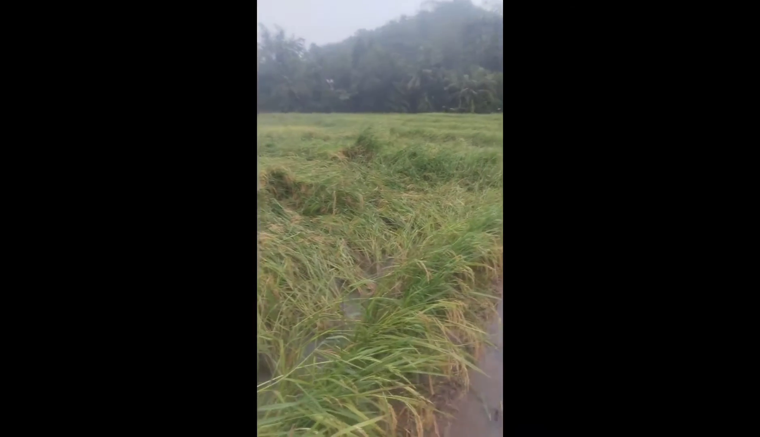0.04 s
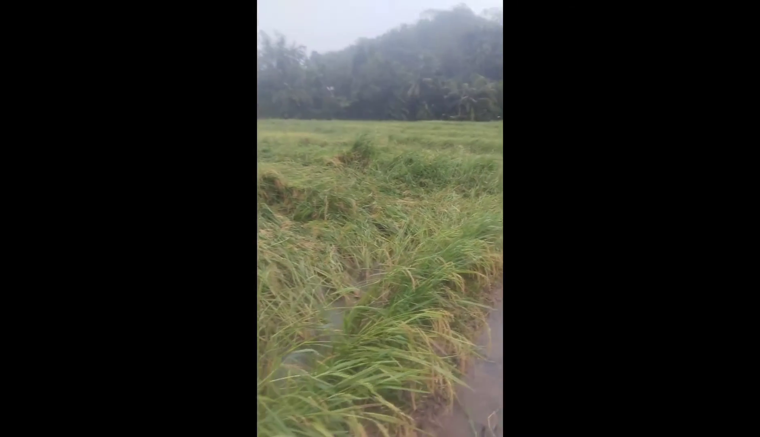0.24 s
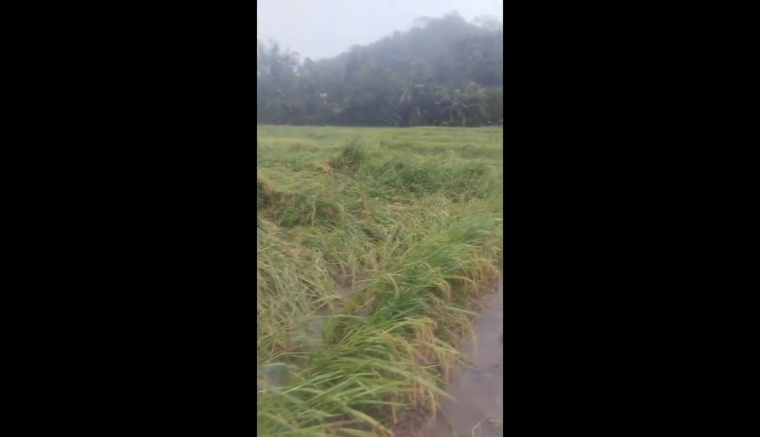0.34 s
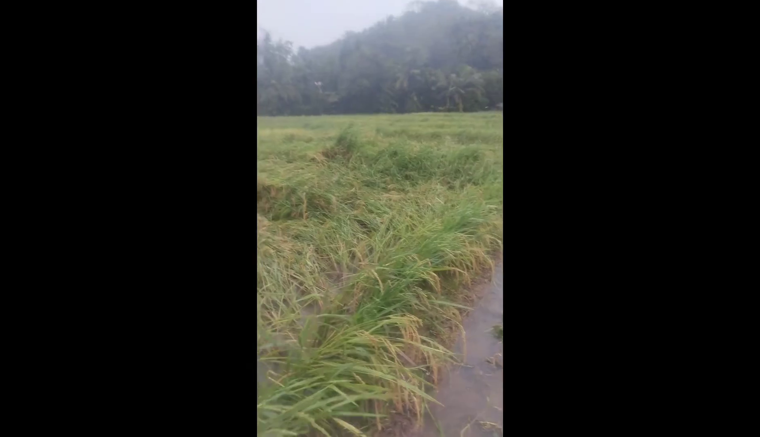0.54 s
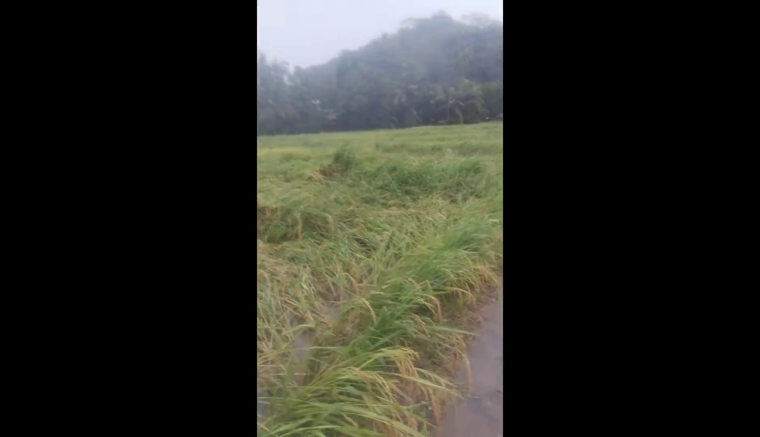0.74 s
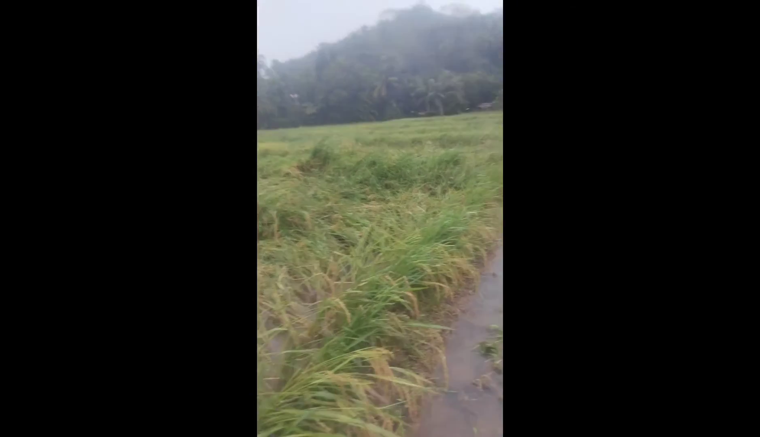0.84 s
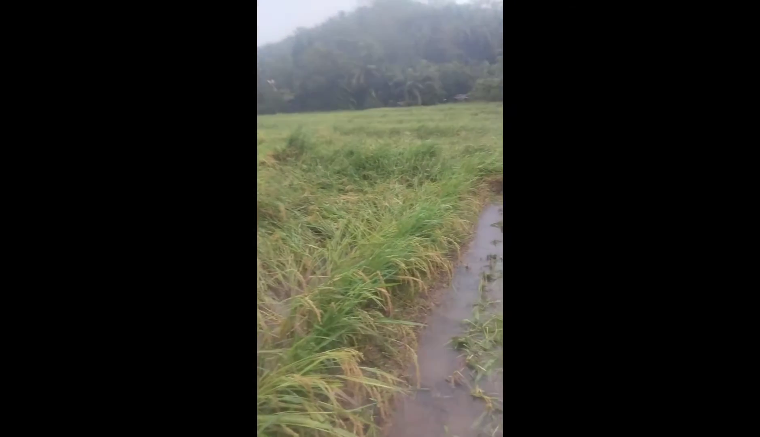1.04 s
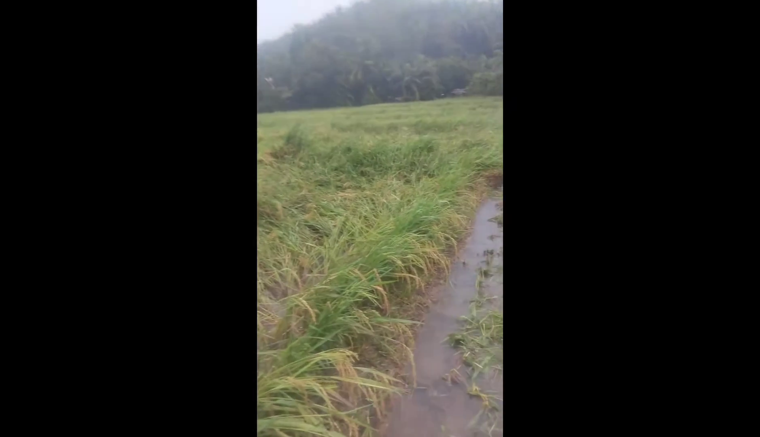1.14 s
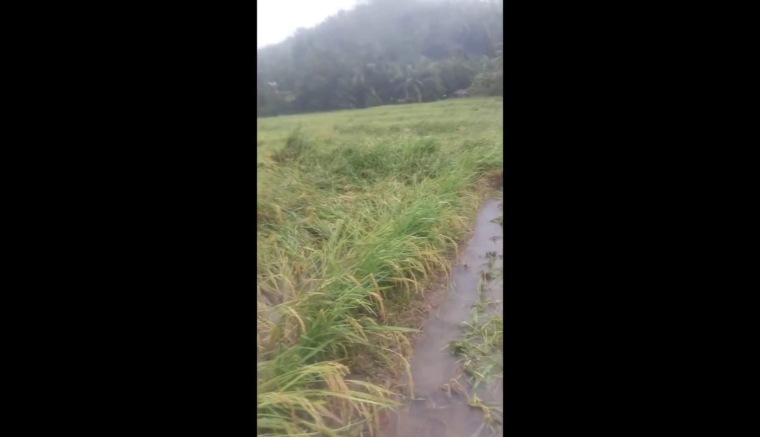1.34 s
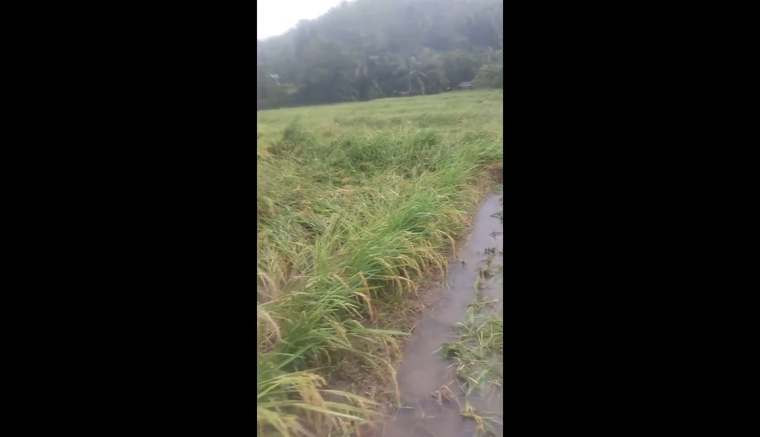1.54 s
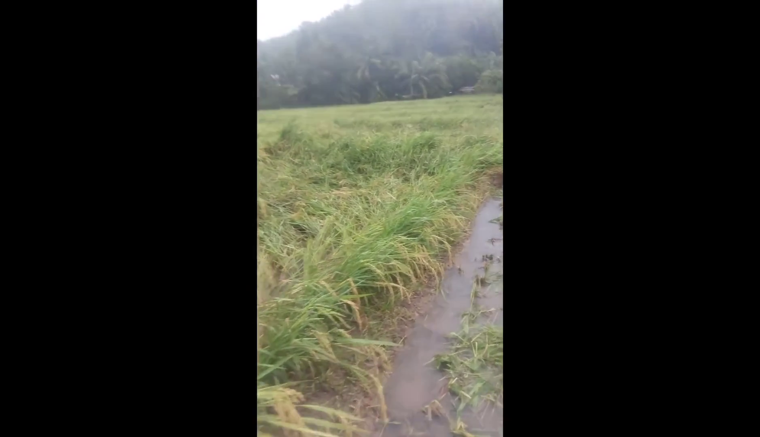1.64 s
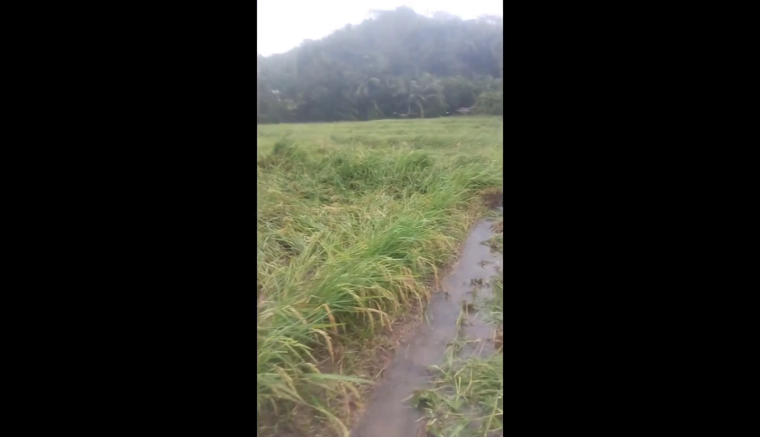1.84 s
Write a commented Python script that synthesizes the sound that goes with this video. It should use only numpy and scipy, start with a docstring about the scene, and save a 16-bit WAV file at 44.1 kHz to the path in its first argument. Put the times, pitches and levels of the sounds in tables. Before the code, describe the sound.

Close to the microphone, a foot squelches into wet mud with a sharp smack and small splash, then a second step lands with a hollow gulp and bubbles. Insects, a bird and distant calls sound faintly across the open field.

```python
"""Two slow, close steps squelch through the mud and shallow water of a flooded rice field.
Each foot lands with a thud or a gulp of trapped air, mud pockets smack open, and water splashes
and drips back. Behind them: insect hiss and trills, a low rumble, faint far calls and a thin
bird whistle. A gain control ducks briefly after loud peaks."""
import sys
import numpy as np
from scipy import signal
from scipy.fft import rfft, irfft, next_fast_len
from scipy.io import wavfile
from scipy.ndimage import map_coordinates

SR = 44100
rng = np.random.default_rng(int(sys.argv[2]) if len(sys.argv) > 2 else 0)


def inscribe(sig):
    """Save sig as 16-bit PCM at rate SR to the path in sys.argv[1].

    A 1-D sig is mono; a 2-D sig holds one channel per row.
    Samples are clipped to [-1, 1] before scaling.
    """
    pcm = np.round(np.clip(np.atleast_2d(sig).T, -1, 1) * 32767)
    wavfile.write(sys.argv[1], SR, pcm.astype(np.int16))


N = 83790
T = np.arange(N) / SR
BUBBLE_GLIDE = 0.088  # fractional pitch rise per t60
WATER_T60_S = 0.36


def amp(db):
    """Decibels to gain."""
    return 10 ** (np.asarray(db) / 20)


def unit(x):
    """Scale to rms 1."""
    return x / np.sqrt(np.mean(x ** 2) + 1e-20)


def add(out, start_s, x):
    """Mix x into out from start_s."""
    i = max(0, round(start_s * SR))
    out[i:i + len(x)] += x[:max(0, len(out) - i)]


def response(points, size):
    """FFT bin gains from (f/Hz, level/dB) points, log frequency axis."""
    hz, db = np.transpose(points)
    return amp(np.interp(np.log(np.fft.rfftfreq(size, 1 / SR) + 1), np.log(hz), db))


def colour(x, points):
    """Zero-phase filter through the points."""
    size = next_fast_len(len(x) + 8192)
    return irfft(rfft(x, size) * response(points, size), size)[:len(x)]


def impulse(points, size):
    """Minimum-phase impulse response: sharp front, peak 1."""
    cepstrum = irfft(np.log(response(points, size)), size)
    cepstrum[1:size // 2] *= 2
    cepstrum[size // 2 + 1:] = 0
    pulse = irfft(np.exp(rfft(cepstrum)), size)
    return pulse / np.abs(pulse).max()


def noise(points):
    """Coloured noise, rms 1."""
    return unit(colour(rng.standard_normal(N), points))


def wobble(knots_per_s):
    """Smooth random curve."""
    knots = rng.standard_normal(int(N * knots_per_s / SR) + 4)
    return map_coordinates(knots, [T * knots_per_s])


def tone(hz):
    """Sine following a pitch curve."""
    return np.sin(2 * np.pi * np.cumsum(hz) / SR)


def washed(x, wash_db, t60_s):
    """x plus a diffuse tail of its own colour."""
    t = T[:SR // 2]
    tail = rng.standard_normal(len(t)) * amp(-60 * t / t60_s) * (1 - np.exp(-t / 0.0022))
    wash = signal.fftconvolve(x, tail / np.linalg.norm(tail))
    return np.pad(x, (0, len(t) - 1)) + amp(wash_db) * wash


def ring(hz, rise_s, t60_s, glide):
    """Damped sine with soft onset and pitch glide."""
    t = T[:SR // 5]
    onset = np.sin(np.pi / 2 * np.minimum(t / rise_s, 1)) ** 2
    decay = amp(-60 * np.maximum(t - rise_s, 0) / t60_s)
    return onset * decay * tone(hz * (1 + glide * np.minimum(t / t60_s, 1)))


def specks(per_s, spread_db):
    """Tiny random impacts of uneven size."""
    size = amp(spread_db * np.minimum(rng.exponential(size=N), 4))
    return (rng.random(N) < per_s / SR) * size * rng.choice([-1, 1], N)


# hiss spectrum: f/Hz, level/dB
INSECT_SPECTRUM = [(4700, -25), (5150, -17), (5500, -13.5), (5900, -8), (6400, -10), (7200, -3.5),
                   (7800, 6), (8400, 3.5), (9200, -9.5), (10700, -21), (12000, -17.5), (13200, -4.5),
                   (15500, -16)]
# hiss envelope: t/s, level/dB
INSECT_ENVELOPE = [(0, -65.5), (0.3, -60), (0.45, -63), (1.25, -59.5), (1.66, -59), (1.9, -58.5)]


def insect_hiss():
    """Insects merge into a steady high hiss."""
    level_db = np.interp(T, *np.transpose(INSECT_ENVELOPE)) + 0.2 * wobble(36)
    return amp(level_db) * noise(INSECT_SPECTRUM)


# insect notes: f/Hz, level/dB, start/s, end/s
TRILLS = [(5150, -78, 0.0, 1.9), (4560, -73, 0.62, 1.2)]


def insect_trills():
    """Far insects hold thin, wavering notes."""
    out = np.zeros(N)
    for hz, db, start_s, end_s in TRILLS:
        gate = np.clip(np.minimum(T - start_s, end_s - T) / 0.071, 0, 1)
        out += gate * amp(db + 4 * wobble(22)) * tone(hz + 70 * wobble(300))
    return out


# still air: f/Hz, level/dB
AIR_SPECTRUM = [(100, -12.5), (300, 2), (500, -3), (900, -1.5), (1400, -4), (2000, -6.5), (3000, -11.5),
                (4500, -28.5), (9000, -17), (16000, -19)]


def air():
    """Faint, even noise of still air."""
    return amp(-72.5) * noise(AIR_SPECTRUM)


# rumble spectrum: f/Hz, level/dB
RUMBLE_SPECTRUM = [(20, -16.5), (45, -10.5), (80, -4.5), (115, 0.5), (170, -7), (260, -18), (450, -24.5),
                   (1000, -63.5)]
# rumble envelope: t/s, level/dB
RUMBLE_ENVELOPE = [(0, -60), (0.15, -72.5), (0.27, -55.5), (0.38, -55.5), (0.54, -71.5), (0.66, -61),
                   (0.87, -59.5), (0.97, -70), (1.06, -64), (1.14, -54), (1.21, -60), (1.28, -56),
                   (1.4, -67.5), (1.72, -71), (1.9, -75)]


def rumble():
    """Low noise that swells and sinks."""
    level_db = np.interp(T, *np.transpose(RUMBLE_ENVELOPE)) + 0.5 * wobble(6.7)
    return amp(level_db) * noise(RUMBLE_SPECTRUM)


# drop and stalk ticks: t/s, level/dB, t60/s
TICKS = [(0.0165, -61, 0.0035), (0.079, -48, .004), (0.1888, -38, .01), (0.6935, -36, .005),
         (0.6965, -42, .003), (0.7296, -35, 0.001), (0.763, -44, 0.0064), (1.0865, -37.5, 0.0029),
         (1.19, -63, 0.00356), (1.1962, -35.5, 0.01), (1.2077, -28, 0.0043), (1.301, -51.5, 0.0057),
         (1.336, -47.5, .004), (1.5045, -37, 0.0043)]
# tick spectrum: f/Hz, level/dB
TICK_SPECTRUM = [(500, -23), (3500, -28), (4800, -7), (6200, 14.5), (9000, 2), (14000, -10.5),
                 (16000, -22.5)]


def ticks():
    """Drops and wet stalks tick over a faint trickle."""
    out, t = np.zeros(N), T[:SR // 20]
    for start_s, db, t60_s in TICKS:
        add(out, start_s, noise(TICK_SPECTRUM)[:len(t)] * amp(db - 60 * t / t60_s))
    trickle = unit(colour(specks(per_s=150, spread_db=3), TICK_SPECTRUM))
    return out + amp(-71.5) * trickle


# air bubbles: t/s, f/Hz, level/dB, rise/s, t60/s, wash/dB
BUBBLES = [(0.078, 5120, -56, 0.0029, 0.034, -16), (0.256, 2790, -63, 0.0023, 0.061, -20.5),
           (0.513, 3450, -44, .001, 0.013, -2), (0.521, 2750, -45, 0.0007, 0.028, -1),
           (0.528, 2410, -42.5, 0.0013, 0.017, 5), (0.541, 3700, -44.5, 0.00052, 0.0074, 3),
           (0.552, 2520, -42.5, 0.0014, .02, -12), (0.5895, 1920, -36, 0.0015, 0.017, -5),
           (0.596, 2730, -43, 0.00092, 0.035, -24), (0.598, 1383, -48.5, 0.0063, 0.11, -20),
           (0.609, 2300, -42.5, .001, 0.012, -23), (0.694, 1431, -45.5, 0.00065, 0.058, -2),
           (0.729, 950, -49, 0.00036, .03, -10), (0.757, 1427, -48, 0.0018, 0.041, -10),
           (0.760, 794, -49, 0.00068, .025, -7.5), (0.762, 4280, -52, .002, 0.026, -13),
           (0.855, 2376, -56, 0.0017, 0.06, -16), (0.923, 507, -46, 0.0019, .03, -10.5),
           (0.934, 1820, -52, .003, .03, -10), (1.187, 648, -44.5, 0.00086, 0.034, 9.5),
           (1.192, 1429, -43, 0.0021, 0.041, 3), (1.2073, 1163, -27, .0007, 0.022, -9.5),
           (1.2063, 2340, -38, 0.00045, 0.031, -23), (1.2103, 708, -16.5, 0.0015, 0.026, -25),
           (1.2112, 448, -31.5, 0.0026, 0.059, -23), (1.2185, 812, -29, 0.0015, 0.015, -7.5),
           (1.252, 510, -40.5, 0.0021, 0.016, 2), (1.295, 760, -37.5, 0.0017, 0.01, -1),
           (1.3215, 1770, -31, 0.0011, .014, -8), (1.3228, 2174, -32, 0.0018, 0.0092, -7.5),
           (1.371, 2190, -49.5, 0.0018, 0.0099, -5.5), (1.406, 1810, -45.5, 0.0013, 0.015, -29),
           (1.449, 1304, -44, 0.0091, 0.053, -3.5), (1.514, 2705, -45.5, 0.00087, 0.021, -5.5),
           (1.539, 1346, -37.5, 0.0021, 0.03, 1), (1.542, 2525, -37.5, 0.00074, 0.021, -3.5),
           (1.543, 4910, -51.5, 0.00081, 0.013, -7), (1.553, 1580, -39, 0.00075, 0.012, -10),
           (1.561, 2570, -44, .001, .016, -8), (1.562, 1300, -36.5, 0.0015, 0.011, -15),
           (1.577, 1210, -49, 0.00079, 0.044, -26), (1.5805, 1420, -36, 0.0014, .016, -26),
           (1.581, 2020, -45.5, 0.00092, 0.047, -12), (1.807, 2680, -49, 0.0014, 0.028, -10)]


def bubbles():
    """Trapped air gulps and plinks, rising slightly in pitch."""
    out = np.zeros(N)
    for start_s, hz, db, rise_s, t60_s, wash_db in BUBBLES:
        bubble = ring(hz, rise_s, t60_s, BUBBLE_GLIDE)
        add(out, start_s, amp(db) * washed(bubble, wash_db, WATER_T60_S))
    return out


def calls(notes, arch_hz, waver_hz, flutter_db, wash_db):
    """Arched whistled notes echoing over the field."""
    out = np.zeros(N)
    for start_s, length_s, db, top_hz in notes:
        n = int(length_s * SR)
        progress = T[:n] / length_s
        hz = top_hz - arch_hz * (2 * progress - 1) ** 2 + waver_hz * wobble(130)[:n]
        envelope = np.sin(np.pi * progress) ** 0.7 * amp(db + flutter_db * wobble(70)[:n])
        add(out, start_s, washed(envelope * tone(hz), wash_db, t60_s=0.39))
    return out


# far notes: t/s, length/s, level/dB, top f/Hz
FAR_CALLS = [(0.17, .11, -67.5, 1440), (0.285, 0.069, -51.5, 1427), (0.62, 0.34, -72, 1400),
             (0.87, 0.14, -65.5, 1400), (1.09, 0.075, -61, 1472), (1.11, 0.038, -59, 1260),
             (1.57, 0.104, -61, 1428), (1.68, 0.06, -57.5, 1423), (1.845, 0.04, -56.5, 1270)]


def far_calls():
    """Faint, wavering calls with a strong echo."""
    return calls(FAR_CALLS, arch_hz=30.3, waver_hz=49, flutter_db=4.5, wash_db=-7.5)


# foot impacts: t/s, f/Hz, level/dB, rise/s, t60/s
THUDS = [(0.1915, 393, -33.5, 0.0073, 0.024), (0.1988, 107.6, -22.5, 0.0025, 0.093),
         (0.2008, 221, -29, 0.0029, 0.038), (0.298, 244, -40.5, 0.0056, 0.11),
         (0.579, 99, -45, 0.012, 0.06), (1.031, 260, -53.5, 0.0072, 0.068),
         (1.067, 155, -47.5, .008, 0.044), (1.208, 250, -47, .004, .06)]


def thuds():
    """The foot's weight shakes the soft bed."""
    out = np.zeros(N)
    for start_s, hz, db, rise_s, t60_s in THUDS:
        thud = ring(hz, rise_s, t60_s, glide=0)
        add(out, start_s, amp(db) * washed(thud, wash_db=-9, t60_s=0.4))
    return out


# mud pockets: t/s, f/Hz, level/dB, t60/s, crack/dB, wash/dB
SMACKS = [(0.3165, 880, -12, 0.0057, -9, -12.5), (0.3465, 3230, -16.5, 0.0057, 2, -44.5),
          (0.3475, 5420, -9, 0.0024, -7.5, -45), (0.3470, 2190, -5.5, 0.006, -10.5, -37),
          (0.3487, 1234, 0.5, 0.006, -13, -27.5), (0.4555, 1680, -18, 0.0013, -2, -7),
          (0.506, 1015, -37.5, 0.028, -13.5, -38), (1.5045, 958, -30, 0.021, -17.5, -17.5),
          (1.5319, 1250, -35, 0.034, -20.5, -15)]
# crack spectrum: f/Hz, level/dB
CRACK_SPECTRUM = [(300, -19.5), (1500, -4.5), (3200, 4), (6000, 2), (9000, -18.5), (11500, -17),
                  (13700, -7.5), (15000, -16), (16000, -32)]
CRACK_T60_S, CRACK_GRIT = 0.0018, 0.072


def smacks():
    """A mud pocket tears open with a gritty crack, then rings briefly."""
    out, t = np.zeros(N), T[:SR // 20]
    snap = impulse(CRACK_SPECTRUM, size=512)
    for start_s, hz, db, t60_s, crack_db, wash_db in SMACKS:
        pocket = -np.cos(2 * np.pi * hz * t) * amp(-60 * t / t60_s) * (1 - np.exp(-t / 0.00008))
        tear = CRACK_GRIT * rng.standard_normal(len(t)) * amp(-60 * t / CRACK_T60_S) - (t == 0)
        crack = amp(crack_db) * np.convolve(tear, snap)[:len(t)]
        # a pocket radiates little far below its pitch
        low_cut = signal.butter(2, 0.19 * hz, "high", fs=SR, output="sos")
        smack = signal.sosfilt(low_cut, pocket + crack)
        add(out, start_s, amp(db) * washed(smack, wash_db, WATER_T60_S))
    return out


def droplets(per_s, spread_db, t60_cycles):
    """Dense cloud of small ringing bubbles."""
    when, pitch, size = rng.random((int(per_s * N / SR), 3)).T[:, :, None]
    hz = 600 * 8 ** pitch
    samples = np.arange(SR // 50)
    life = samples / SR * hz / t60_cycles  # 1 at 60 dB down
    envelope = hz * amp(-spread_db * np.log(size + 0.043) - 60 * life)
    grains = envelope * np.sin(2 * np.pi * t60_cycles * life * (1 + BUBBLE_GLIDE * life))
    positions = (when * N).astype(int) + samples
    return np.bincount(positions.ravel(), grains.ravel(), N)[:N]


# thrown water: peak t/s, level/dB, rise/s, fall/(dB/s), spray/dB
SPLASHES = [(0.452, -42.5, 0.035, 135, -11.5), (0.679, -74, 0.22, 48, 15), (1.225, -62.5, 0.042, 103, 4),
            (1.53, -48, 0.0214, 186, -7)]
# sloshing water: f/Hz, level/dB
SLOSH_SPECTRUM = [(150, -29), (400, -16), (750, -8.5), (1100, -3.5), (1800, -0.5), (2650, -2),
                  (3100, -12.5), (5000, -10), (9000, -22), (16000, -42)]
# fine spray: f/Hz, level/dB
SPRAY_SPECTRUM = [(1000, -25), (3000, -31), (4500, 1), (6000, 2.5), (8000, -1), (11000, -0.5),
                  (13500, -0.5), (16000, -17)]
DROPLET_POWER_SHARE = 0.7


def splashes():
    """Thrown water swells and falls back as bubbles and fine spray."""
    cloud = unit(colour(droplets(per_s=1100, spread_db=2, t60_cycles=17), SLOSH_SPECTRUM))
    slosh = np.sqrt(DROPLET_POWER_SHARE) * cloud
    slosh += np.sqrt(1 - DROPLET_POWER_SHARE) * noise(SLOSH_SPECTRUM)
    spray = unit(colour(specks(per_s=5000, spread_db=6), SPRAY_SPECTRUM))
    out = np.zeros(N)
    for peak_s, db, rise_s, fall_db_per_s, spray_db in SPLASHES:
        swell_db = -10 * (np.maximum(peak_s - T, 0) / rise_s) ** 2
        decay_db = -fall_db_per_s * np.maximum(T - peak_s, 0)
        out += amp(db + swell_db + decay_db) * (slosh + amp(spray_db) * spray)
    return out


# bird notes, both tables: t/s, length/s, level/dB, top f/Hz
WHISTLES = [(0.918, .102, -48.5, 3300), (1.50, 0.157, -59, 3363), (1.835, 0.114, -56, 3360)]
CHIRPS = [(1.05, 0.038, -62, 3346), (1.432, 0.0336, -54.5, 3347)]


def bird():
    """One bird: thin whistles and short, rough chirps."""
    whistles = calls(WHISTLES, arch_hz=155, waver_hz=28.2, flutter_db=3, wash_db=-14.5)
    chirps = calls(CHIRPS, arch_hz=155, waver_hz=89.4, flutter_db=3, wash_db=-8.5)
    return whistles + chirps


def scene():
    """Steps close by, the field behind; mono."""
    voices = bird() + far_calls()
    steps = thuds() + smacks() + bubbles() + ticks() + splashes()
    field = insect_trills() + insect_hiss() + rumble() + air()
    return (voices + steps + field)[None]


LIMIT_DB, DUCK_DB, ATTACK_S, RECOVER_S = -14, 10, 0.0037, 0.04
LOW_CUT_HZ, TOP_HZ = 83, 15650


def record(dry):
    """Gain control ducks after loud peaks; deep bass and top treble are cut."""
    loud = np.abs(dry[0]) > amp(LIMIT_DB)
    since_peak_s = T - np.maximum.accumulate(np.where(loud, T, -10))
    duck = np.exp(-since_peak_s / RECOVER_S) * (1 - np.exp(-since_peak_s / ATTACK_S))
    ducked = dry * amp(-DUCK_DB * duck)
    size = next_fast_len(N + SR // 2)
    hz = np.fft.rfftfreq(size, 1 / SR)
    band = hz ** 2 / np.hypot(hz ** 2, LOW_CUT_HZ ** 2) * (hz < TOP_HZ)
    return irfft(rfft(ducked, size) * band, size)[:, :N]


dry = scene()
out = record(dry)
inscribe(out)
```